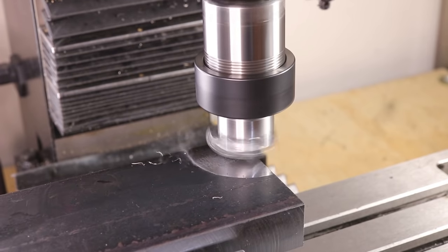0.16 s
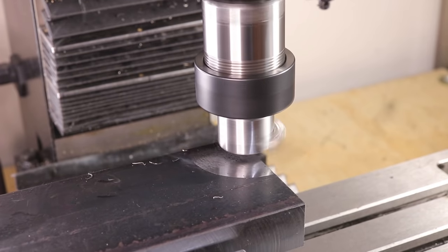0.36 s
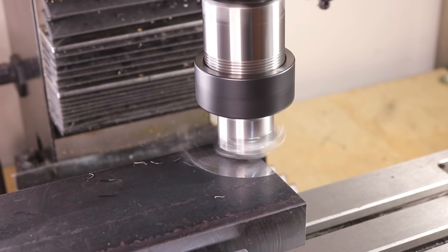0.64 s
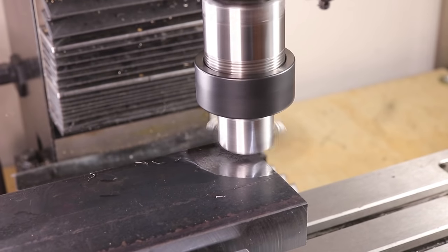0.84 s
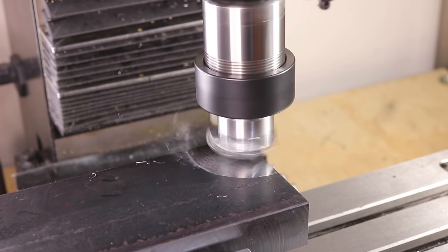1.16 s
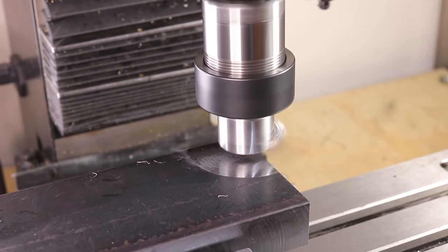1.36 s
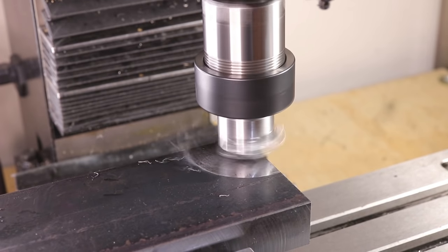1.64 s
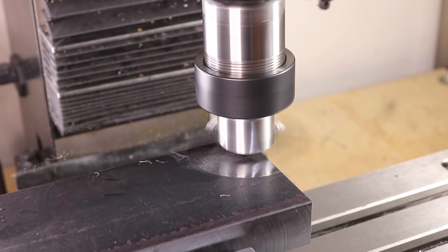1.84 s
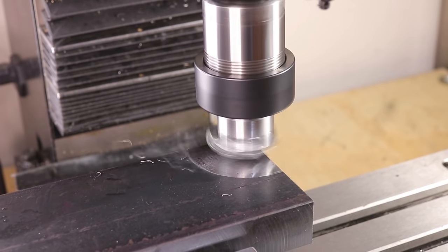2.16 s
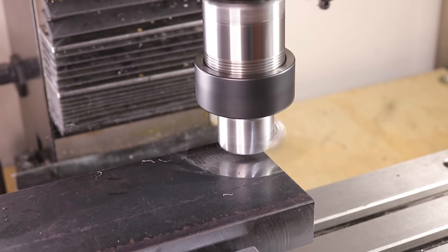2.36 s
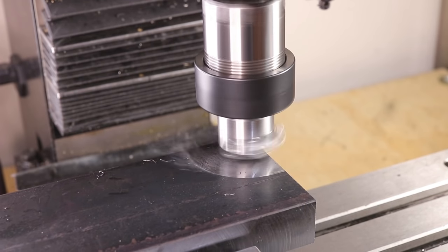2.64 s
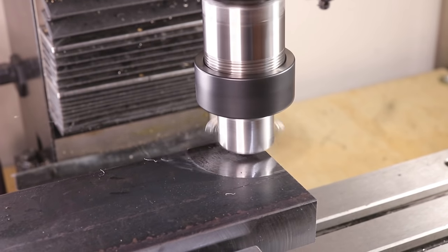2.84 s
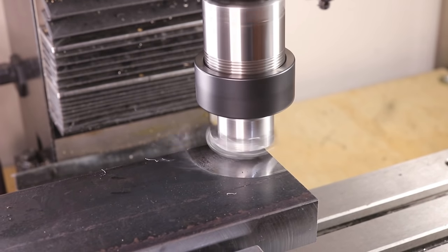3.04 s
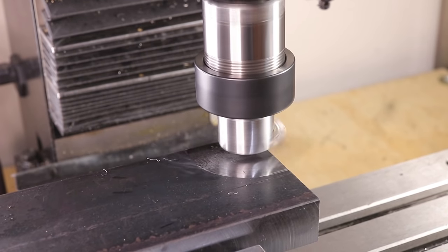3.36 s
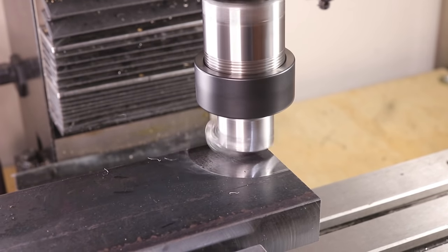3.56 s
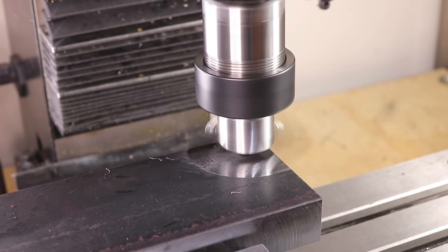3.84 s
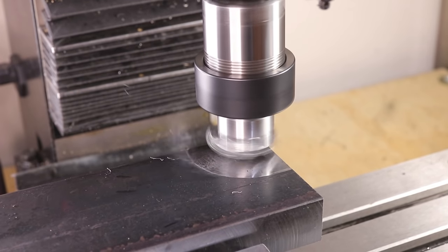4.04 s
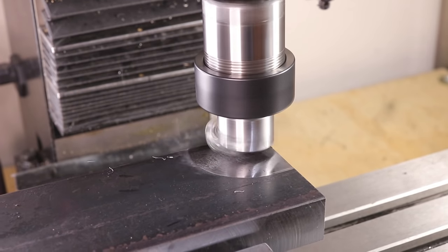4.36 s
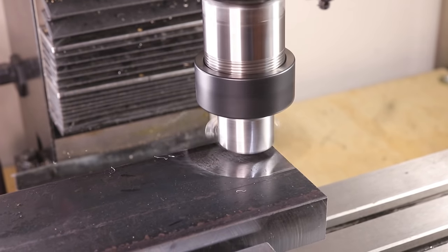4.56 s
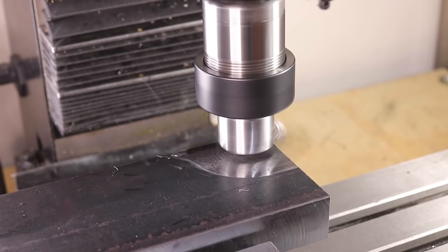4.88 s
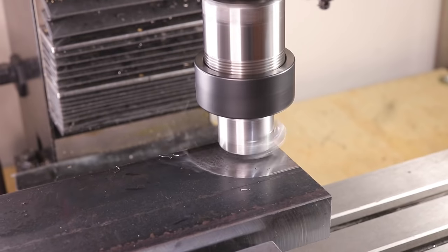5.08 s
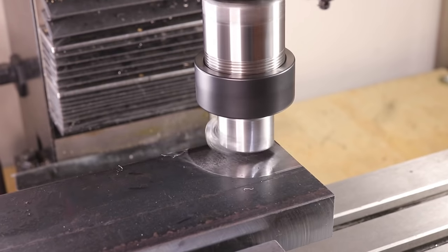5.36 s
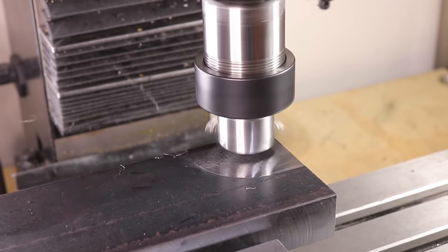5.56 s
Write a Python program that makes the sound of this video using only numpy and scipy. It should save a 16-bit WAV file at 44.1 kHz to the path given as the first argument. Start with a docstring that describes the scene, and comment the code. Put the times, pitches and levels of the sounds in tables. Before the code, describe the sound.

A small milling machine cuts a steel block in a workshop, heard close up in stereo. The cutter strikes about eight times a second, each pass a bright tick, a short scraping hiss with a thin squeal, and a ringing metallic knock. The motor rumbles and hums steadily underneath. After about four seconds, the whole sound abruptly jumps to twice the pace and an octave higher.

```python
"""Fly cutter on a small mill

In a workshop, a stereo pair close to a single-point cutter facing a steel block, eight turns a second.
Each turn the tip ticks into the edge, shears a chip with a swelling hiss and squeal, and knocks free,
leaving the head juddering. Behind it the drive rumbles and hums, with a little of the room on the cut.
Late on, the sound is played at double speed: twice the pace, an octave higher."""
import sys
import numpy as np
from scipy import signal
from scipy.fft import rfft, irfft, next_fast_len
from scipy.io import wavfile
from scipy.ndimage import uniform_filter1d

SR = 44100
rng = np.random.default_rng(int(sys.argv[2]) if len(sys.argv) > 2 else 0)


def transcribe(signal):
    """Save signal, clipped to [-1, 1], as a 16-bit WAV file at the path in sys.argv[1]."""
    frames = np.atleast_2d(signal).T
    limited = np.clip(frames, -1, 1)
    pcm = np.round(limited * 32767).astype(np.int16)
    wavfile.write(sys.argv[1], SR, pcm)


N = 251811

# Pitches and durations are for normal speed; start_s and time_s are as heard. Levels are relative.
# decay of the workshop: frequency_hz, t60_s
ROOM_DECAY = [(200, 0.13), (2000, 0.49), (8000, 0.25), (16000, 0.26)]
# level of the running machine, shared by rumble and cut: time_s, level_db
MACHINE_LEVEL = [(0, -33.5), (.8, -36), (2, -38.5), (2.8, -39), (3.3, -37.5), (4, -40), (4.3, -38.5),
                 (5.71, -39.5)]
# broad rumble of the drive: frequency_hz, level_db
RUMBLE_SPECTRUM = [(12, -31), (40, -22), (60, -19.5), (150, -17), (250, -13), (310, -5), (500, -6.5),
                   (1000, -1.5), (2000, -5), (3000, -9.5), (4800, -20), (6000, -11), (10000, -15),
                   (12500, -31), (14500, -50), (16000, -62)]
# resonances of the castings: pitch_hz, width_hz, level_db
CASTING_RINGS = [(338.6, 62, -5), (402.6, 31, -5), (445.5, 41, -6.5), (545, 67, -5), (714, 14, -4.5),
                 (797, 10.4, -3), (854, 9, -0.5), (951.5, 33, -4.5), (1323, 35, -11), (1530, 200, -15),
                 (1730, 46, -11.5), (3575, 77, -5)]
# how alike the drive is at the two microphones: frequency_hz, likeness
DRIVE_LIKENESS = [(60, 0.9), (180, 0.99), (550, 0.88), (1650, 0.39), (4970, 0.072), (15000, 0.15)]
# part of the rumble that repeats with each turn: frequency_hz, power_share
REPEATING_SHARE = [(40, 0.84), (400, 0.71), (550, 0.53), (800, 0.093), (1300, 0.076)]
# multiples of the turning rate that stand out of the rumble: multiple, boost_db
SPINDLE_ORDERS = [(8, 7), (16, 6.5), (23, 9), (40, 7.5), (43, 1), (45, 9.5), (47, 9.5), (49, 3.5), (50, 2),
                  (55, 9)]
# crests of the hum: time_s, level_db
HUM_CRESTS = [(0, -43.5), (2.25, -42), (4.62, -41.5)]
# judder of the unloaded head: frequency_hz, level_db
JUDDER_SPECTRUM = [(120, -56), (350, -10.5), (650, -2), (900, -3.5), (1450, -1.5), (1900, -10), (2600, -13),
                   (6000, -27.5)]
# passes of the tip through the block: start_s, tick_db, squeal_db, knock_db
CUTS = [(-.0606, -27, -28, -31), (0.0647, -28, -26, -24.5), (0.189, -22, -27, -30),
        (0.314, -20, -29.5, -26.5), (0.4385, -17.5, -23.5, -22.5), (0.5632, -17.5, -21.5, -22.5),
        (0.6884, -19.5, -34.5, -26), (.8136, -24, -29.5, -26), (0.9391, -25, -24.5, -27.5),
        (1.0632, -25, -25, -26), (1.1893, -19, -28, -26), (1.3145, -17.5, -28.5, -26),
        (1.4399, -17.5, -24.5, -26), (1.5645, -19, -22.5, -28.5), (1.6899, -19.5, -27, -30.5),
        (1.8151, -19, -25.5, -24.5), (1.94, -18, -26.5, -34), (2.0655, -17.5, -34.5, -26),
        (2.1904, -18.5, -26, -27.5), (2.3157, -20, -27.5, -26.5), (2.4405, -21.5, -30.5, -21),
        (2.5659, -24.5, -23.5, -23), (2.6909, -22.5, -23, -24.5), (2.8173, -19.5, -28, -29),
        (2.9427, -19.5, -27.5, -25.5), (3.0681, -19, -23, -27.5), (3.1936, -21, -27, -22),
        (3.3187, -17.5, -24, -22.5), (3.4438, -18.5, -34.5, -25.5), (3.5686, -17, -31, -24),
        (3.6932, -18, -30.5, -23.5), (3.8182, -18, -29, -30), (3.9434, -20.5, -32.5, -26),
        (4.0683, -19, -26.5, -28.5), (4.1935, -17, -25, -25), (4.273, -29, -37.5, -27),
        (4.3353, -25, -25.5, -29), (4.3975, -19, -29, -28.5), (4.4604, -29, -24, -24),
        (4.5229, -26.5, -30.5, -27.5), (4.5855, -26.5, -24.5, -25.5), (4.648, -20, -19, -24),
        (4.7109, -19, -32.5, -25), (4.7731, -28, -26.5, -24), (4.8351, -37, -28.5, -28.5),
        (4.8977, -26, -34, -28), (4.9603, -26, -24.5, -27.5), (5.0234, -26, -25.5, -27.5),
        (5.0853, -20, -27, -25.5), (5.148, -18, -23, -31.5), (5.2102, -21, -33, -25),
        (5.2725, -21, -33, -28), (5.3355, -27, -21, -32.5), (5.398, -25.5, -26.5, -32),
        (5.4604, -18, -21, -29), (5.523, -22, -20, -30.5), (5.5855, -27.5, -29, -30.5),
        (5.648, -24, -21, -26.5)]
# the tip's contacts around each entry, at each microphone: offset_ms, left_db, right_db
TIP_CONTACTS = [(-2.1, -8, -12), (-1.35, -12, -10), (-.85, -7, 0), (.3, -6, -9), (2.4, -8, -15),
                (4, -11, -16)]
# chip load while the tip is in the metal: share_of_cut, shear_db, squeal_db
CHIP_LOAD = [(0, -20, -36), (.12, -3.5, -44), (.3, -1.5, -17), (.55, 0.5, -9), (.8, 2.5, 2), (1, 5, 1.5)]
# broad hiss of the chip: frequency_hz, level_db
HISS_SPECTRUM = [(600, -24), (2000, 19), (4000, 14), (5000, 13), (6500, 23), (10300, 5.5), (10900, -27),
                 (14200, -4), (14700, -29), (16000, -30)]
# broad thud of the exit: frequency_hz, level_db
THUD_SPECTRUM = [(100, -38), (200, 8), (350, -11), (700, 9), (1100, -29), (1750, -8), (2600, -18),
                 (4000, -29), (7000, -41), (12000, -28), (16000, -32)]
# modes of cutter, spindle head and block: pitch_hz, t60_s, shear_db, exit_db, entry_db
MILL_MODES = [(182, 0.047, -23.5, -26, -40), (359, 0.058, -16, -18, -40), (647, 0.047, -8, -16.5, -40),
              (724, 0.047, -7, -12.5, -36), (876.5, 0.19, -1, -19.5, -49), (1257, 0.037, -9, -14.5, -46),
              (1482, 0.037, -6.5, -18.5, -50), (1595, 0.045, -3, -9, -43), (1758, 0.031, -1, -1.5, -45),
              (1946, 0.021, -8, -4, -40), (2376, 0.049, -25, -15.5, -46), (3098, 0.013, -2.5, -9.5, -40),
              (3500, 0.094, -18, -24, -50), (4226, 0.039, -8, -26, -46), (5270, 0.035, -7, -15.5, -52),
              (5770, 0.029, -6, -13.5, -47), (6250, 0.085, -5.5, -30, -45), (7100, 0.004, -1.5, 1, -9.5),
              (7510, 0.013, 4, -5.5, -9), (8047, 0.0034, 5.5, -26, -4.5), (8290, 0.005, -28, -2, 3),
              (9110, 0.0044, 0.5, -3, 0), (9740, 0.01, -17, -18, -5.5), (9686, 0.0038, -12, -24, -12),
              (10250, 0.0082, 3.5, -7, -10.5), (11110, 0.0087, -3.5, -26, -24),
              (11500, 0.019, -19, -31, -33), (11900, 0.0063, -3, -13.5, -41)]
# where the cutter sits between the microphones: frequency_hz, left_minus_right_db, likeness
CUTTER_IMAGE = [(300, 0.5, 1), (1000, -3.5, 0.96), (3070, -2.5, 0.97), (8100, -5.5, 0.39),
                (15000, -0.5, 0.43)]

ENTRY_S, TICK_DB, SQUEAL_DB, KNOCK_DB = np.transpose(CUTS)
USUAL_KNOCK_DB, USUAL_SQUEAL_DB, TURN_SAMPLES = -26.5, -27, 5520
RUN_IN_S, DOUBLE_SPEED_FROM_S = .2, 4.227
SWITCH = round((RUN_IN_S + DOUBLE_SPEED_FROM_S) * SR)
LENGTH = SWITCH + 2 * (N - round(DOUBLE_SPEED_FROM_S * SR))   # samples of machine time


def from_db(db):
    """Decibels to gain."""
    return 10 ** (np.asarray(db) / 20)


def machine_sample(s):
    """Heard time to a sample of machine time, which passes twice as fast after the switch."""
    return (RUN_IN_S + s + np.maximum(s - DOUBLE_SPEED_FROM_S, 0)) * SR


def at_hz(points, hz):
    """Reads a table's second column on a log-frequency axis."""
    columns = np.transpose(points)
    return np.interp(np.log(hz + 1), np.log(columns[0]), columns[1])


def coloured(x, gain_at):
    """Filters by a gain given as a function of frequency."""
    size = next_fast_len(LENGTH + SR)
    hz = np.arange(size // 2 + 1) * SR / size
    return irfft(rfft(x, size) * gain_at(hz), size)[..., :LENGTH]


def shaped(x, spectrum):
    """Filters by a table of frequency_hz, level_db."""
    return coloured(x, lambda hz: from_db(at_hz(spectrum, hz)))


def rms_one(x):
    """Scales to unit power."""
    return x / np.sqrt(np.mean(x ** 2))


def pair(x, alike):
    """Two unrelated signals to a left-right pair of the given likeness."""
    alike = np.clip(alike, 0, 1)
    return (np.sqrt(1 + alike) * x[0] + np.sqrt(1 - alike) * x[1] * [[1], [-1]]) / np.sqrt(2)


def ring(blows, noise, hz, t60_s):
    """One mode, struck by blows and rubbed by noise."""
    decay, step = from_db(-60 / (t60_s * SR)), 2 * np.pi * hz / SR
    force = blows + np.sqrt(2 - 2 * decay ** 2) * noise + 1e-18
    return signal.lfilter([0, np.sin(step)], [1, -2 * decay * np.cos(step), decay ** 2], force)


def running_db(sample):
    """Level of the running machine at samples of machine time."""
    time_s, level_db = np.transpose(MACHINE_LEVEL)
    return np.interp(sample, machine_sample(time_s), level_db)


def turns_done():
    """Spindle turns completed at each sample."""
    entries = machine_sample(ENTRY_S)
    ends = np.r_[entries[0] - TURN_SAMPLES, entries, entries[-1] + TURN_SAMPLES * np.array([1, 2])]
    return np.interp(np.arange(LENGTH), ends, np.arange(len(ends)))


def workshop(x):
    """The room returns ten trains of echoes to each microphone, lasting longest in the mids."""
    lags_s = rng.uniform(.008, .04, (10, 2, 1))
    signs = (-1) ** np.arange(10)[:, None, None]
    def echoes(hz):
        loop = from_db(-60 * lags_s / at_hz(ROOM_DECAY, hz)) * np.exp(-2j * np.pi * hz * lags_s)
        return np.sum(signs * loop / (1 - loop), axis=0)
    return coloured(x, echoes)


def spindle_pattern(changing_share, cycle_turns):
    """Two unrelated noises that repeat with each turn of the spindle, slowly changing shape."""
    orders = np.exp(2j * np.pi * rng.random((3, 2, TURN_SAMPLES // 2 + 1)))
    for multiple, boost_db in SPINDLE_ORDERS:
        orders[..., int(multiple)] *= from_db(boost_db)
    turns = turns_done()
    place = (turns % 1 * TURN_SAMPLES).astype(int)
    steady, first, second = irfft(orders, TURN_SAMPLES)[..., place] * np.sqrt(TURN_SAMPLES)
    angle = 2 * np.pi * turns / cycle_turns
    changing = np.cos(angle) * first + np.sin(angle) * second
    return np.sqrt(1 - changing_share) * steady + np.sqrt(changing_share) * changing


def drive():
    """Motor, belt and spindle rumble through the castings, wider in the treble."""
    def castings(hz):
        rings = sum(from_db(db) / (1 + (2 * (hz - pitch_hz) / width_hz) ** 2)
                    for pitch_hz, width_hz, db in CASTING_RINGS)
        return from_db(at_hz(RUMBLE_SPECTRUM, hz)) * (0.43 + 2.05 * rings)
    def mid_and_side(hz):
        alike = np.clip(at_hz(DRIVE_LIKENESS, hz), 0, .97)
        return np.sqrt(1 + alike * [[1], [-1]])
    pattern = spindle_pattern(changing_share=0.51, cycle_turns=13.23)
    repeating = coloured(pattern, lambda hz: np.sqrt(at_hz(REPEATING_SHARE, hz)))
    free = coloured(rng.standard_normal((2, LENGTH)), lambda hz: np.sqrt(1 - at_hz(REPEATING_SHARE, hz)))
    force = from_db(running_db(np.arange(LENGTH))) * (from_db(-0.2) * repeating + free)
    mid, side = coloured(force, lambda hz: castings(hz) * mid_and_side(hz))
    noise_gain = np.sqrt(2 * np.mean(castings(np.arange(SR // 2)) ** 2))
    return (mid + side * [[1], [-1]]) / noise_gain


def hum(multiple, rise_db_per_s, fall_db_per_s):
    """A centred, slightly rough multiple of the turning rate swells now and then, throbbing each turn."""
    crest_s, crest_db = np.transpose(HUM_CRESTS)[:, :, None]
    since_s = (np.arange(LENGTH) - machine_sample(crest_s)) / SR
    swells_db = crest_db + np.minimum(rise_db_per_s * since_s, -fall_db_per_s * since_s)
    turns = uniform_filter1d(turns_done(), size=8000)
    waver = rms_one(uniform_filter1d(rng.standard_normal(LENGTH), size=2500))
    throb = 1 + 0.46 * np.cos(2 * np.pi * turns + 2.0) + 0.33 * waver
    tone = np.sin(2 * np.pi * multiple * turns + .7 * waver)
    return from_db(swells_db.max(axis=0)) * throb * tone


def cut_samples():
    """Time in the metal each turn: shorter when the tip breaks out hard or squeals loudly."""
    cut_ms = 40.6 - 0.51 * (KNOCK_DB - USUAL_KNOCK_DB) - 0.15 * (SQUEAL_DB - USUAL_SQUEAL_DB)
    return cut_ms / 1000 * SR


def exit_samples(early_s=0):
    """Machine samples at which the tip leaves the block, or early_s before."""
    return (machine_sample(ENTRY_S) + cut_samples() - early_s * SR).astype(int)


def tearing(rough_db):
    """The chip tears in uneven grains: noise with a heavy-tailed, fast flutter."""
    flutter = rms_one(signal.lfilter([1], [1, -.97], rng.standard_normal(LENGTH)))
    return rms_one(rng.standard_normal((2, LENGTH)) * from_db(rough_db * flutter))


def judder(rise_s, t60_s):
    """The head judders once the load is gone: mid-band noise that swells and dies away."""
    kicks = np.zeros(LENGTH)
    kicks[exit_samples()] = from_db(0.41 * KNOCK_DB - 19.5)
    rise, decay = np.exp(-1 / (rise_s * SR)), from_db(-60 / (t60_s * SR))
    tails = signal.lfilter([1], [1, -decay], kicks + 1e-18)
    envelope = signal.lfilter([1 - rise], [1, -rise], tails)
    noise = pair(tearing(rough_db=1.5), alike=0.73)
    return envelope * rms_one(shaped(noise, JUDDER_SPECTRUM))


def engagement(load_column, levels_db, let_go_s=0.0029):
    """The chip load swells through each cut and dies quickly as the tip leaves."""
    gain, load = np.zeros(LENGTH), np.transpose(CHIP_LOAD)
    release = np.exp(-np.arange(SR // 25) / (let_go_s * SR))
    starts, spans = machine_sample(ENTRY_S).astype(int), cut_samples().astype(int)
    for start, span, level_db in zip(starts, spans, levels_db):
        swell = from_db(level_db + np.interp(np.arange(span) / span, load[0], load[load_column]))
        envelope = np.r_[swell, swell[-1] * release]
        gain[start:start + len(envelope)] = envelope[:LENGTH - start]
    return gain


def entry_ticks():
    """The tip meets the edge in the same short run of bright contacts each turn."""
    clicks = np.zeros((2, LENGTH))
    for offset_ms, left_db, right_db in TIP_CONTACTS:
        at = (machine_sample(ENTRY_S) + offset_ms / 1000 * SR).astype(int)
        clicks[:, at] += from_db(TICK_DB + 5.5 + np.array([[left_db], [right_db]]))
    return signal.sosfilt(signal.butter(2, [6800, 10200], "band", fs=SR, output="sos"), clicks)


def exit_crunch(count):
    """The burr tears off in one knock and a ragged run of smaller ones: their samples and gains."""
    offset_s = np.minimum(rng.exponential(.006, (len(CUTS), count)), .03) - .002
    level_db = -11 - 210 * np.abs(offset_s) + rng.normal(0, 4.9, offset_s.shape)
    gain = from_db(level_db) * rng.choice([-1, 1], offset_s.shape)
    offset_s[:, 0], gain[:, 0] = 0, 1   # the main knock
    gain /= np.linalg.norm(gain, axis=1, keepdims=True)
    knock_at = exit_samples(early_s=.0015)[:, None] + (offset_s * SR).astype(int)
    return knock_at, from_db(KNOCK_DB)[:, None] * gain


def exit_thud(knock_at, knock_gain):
    """The broad, dull part of the tip knocking free."""
    blows = np.zeros(LENGTH)
    blows[knock_at] = from_db(6) * knock_gain
    return shaped(blows, THUD_SPECTRUM)


def shearing():
    """The rough force of parting the chip, a little stronger on turns that squeal."""
    level_db = running_db(machine_sample(ENTRY_S)) - 6 + 0.073 * (SQUEAL_DB - USUAL_SQUEAL_DB)
    return engagement(load_column=1, levels_db=level_db) * tearing(rough_db=2.5)


def squeal(pitch_hz, t60_s):
    """Chatter rings one high mode late in each cut; the running machine keeps it ringing faintly."""
    cutting = engagement(load_column=2, levels_db=SQUEAL_DB)
    idle = from_db(running_db(np.arange(LENGTH)) - 15.5)
    chatter = (cutting + idle) * pair(tearing(rough_db=2.0), alike=.75)
    return ring(0, chatter, pitch_hz, t60_s)


def ringing_steel(ticks, shear, knock_at, knock_gain):
    """Entry ticks, shearing and exit knocks all ring the same modes of cutter, head and block."""
    cuts, modes = len(CUTS), len(MILL_MODES)
    spring_db = rng.normal(0, 1.97, (cuts, modes))   # the tip springs free differently each turn
    mic_db = rng.normal(0, 1.45, (cuts, modes, 2))   # each microphone hears its own mix of modes
    bite_db = rng.normal(0, 2.2, (cuts + 3, modes))   # each chip rubs the modes unevenly
    turn = turns_done().astype(int)
    likeness = np.array(CUTTER_IMAGE)[:, ::2]
    steel = np.zeros((2, LENGTH))
    for k, (hz, t60_s, shear_db, exit_db, entry_db) in enumerate(MILL_MODES):
        exit_gain = from_db(exit_db + 4 + spring_db[:, k] + mic_db[:, k].T)
        knocks = np.zeros((2, LENGTH))
        knocks[:, knock_at] = exit_gain[:, :, None] * knock_gain
        rubbing = from_db(shear_db - 2 + bite_db[:, k])[turn] * pair(shear, at_hz(likeness, hz))
        steel += (-1) ** k * ring(knocks + from_db(entry_db) * ticks, rubbing, hz, t60_s)
    return steel


def cutter():
    """The tip working through the block, close up and a little right of centre."""
    knock_at, knock_gain = exit_crunch(count=14)
    shear = shearing()
    hiss = from_db(-2.5) * shaped(pair(shear, alike=0.18), HISS_SPECTRUM)
    cut = hiss + exit_thud(knock_at, knock_gain)
    cut += ringing_steel(entry_ticks(), shear, knock_at, knock_gain)
    cut += from_db(-4) * squeal(pitch_hz=6464, t60_s=0.029)
    # small parts radiate no deep bass
    cut = signal.sosfilt(signal.butter(3, 150, "high", fs=SR, output="sos"), cut)
    return coloured(cut, lambda hz: from_db(at_hz(CUTTER_IMAGE, hz) * [[.5], [-.5]]))


def scene():
    """The mill in its workshop, the last part played at double speed."""
    cut = cutter() + judder(rise_s=0.0037, t60_s=0.1)
    room = from_db(-17.5) * workshop(cut.mean(axis=0))
    mill = cut + room + drive() + hum(multiple=43, rise_db_per_s=14.5, fall_db_per_s=17)
    normal = mill[:, round(RUN_IN_S * SR):SWITCH]
    fast = signal.resample_poly(mill, 1, 2, axis=1)[:, SWITCH // 2:]
    return np.concatenate([normal, fast], axis=1)[:, :N]


def record(dry):
    """Both microphone channels lose the very top to a steep low-pass."""
    cutoff_hz = 15720
    return signal.sosfilt(signal.ellip(12, .5, 80, cutoff_hz, fs=SR, output="sos"), dry)


dry = scene()
out = record(dry)
transcribe(out)
```